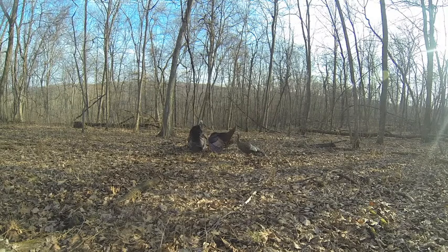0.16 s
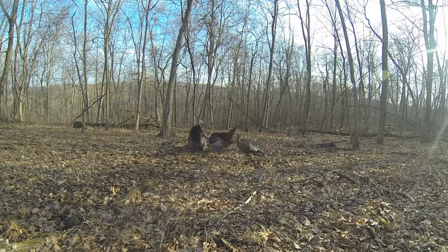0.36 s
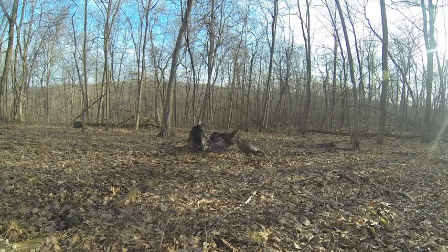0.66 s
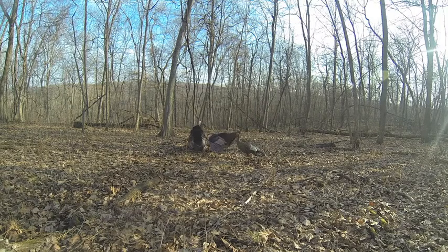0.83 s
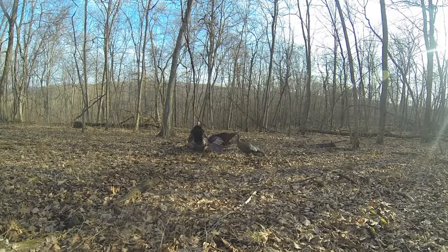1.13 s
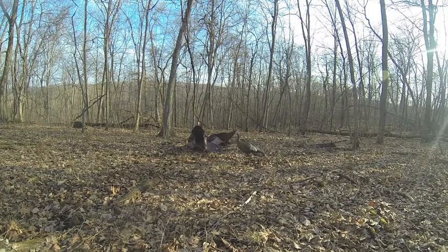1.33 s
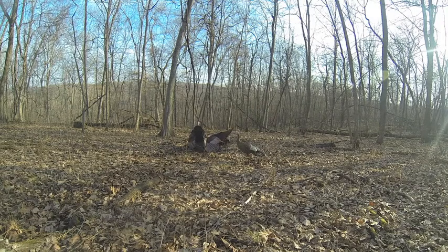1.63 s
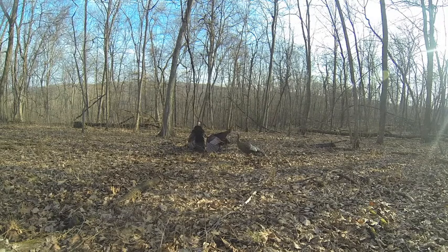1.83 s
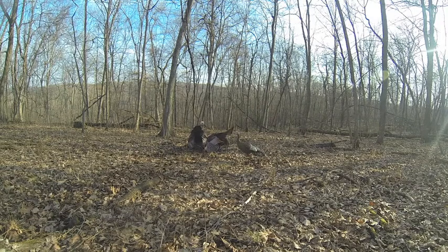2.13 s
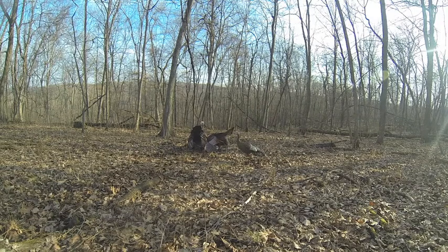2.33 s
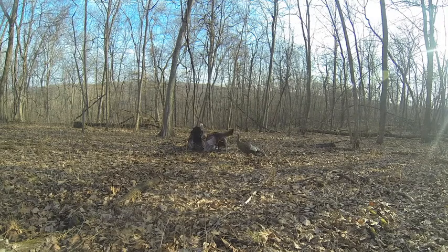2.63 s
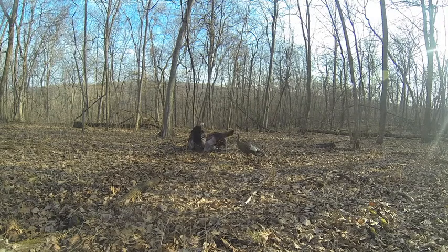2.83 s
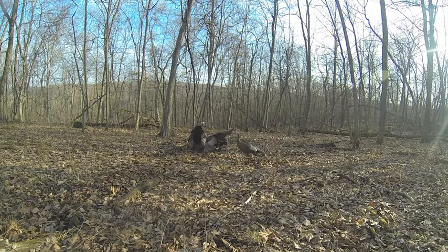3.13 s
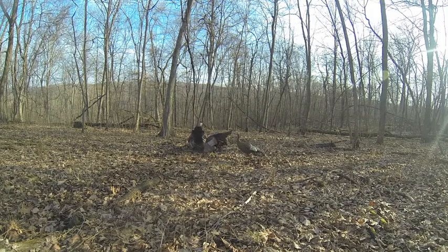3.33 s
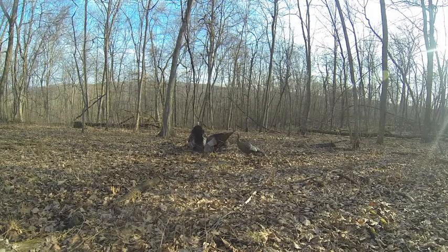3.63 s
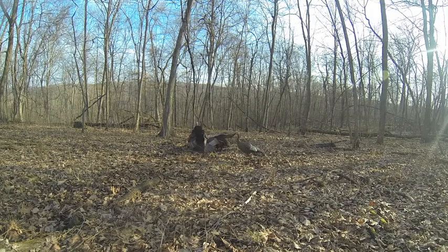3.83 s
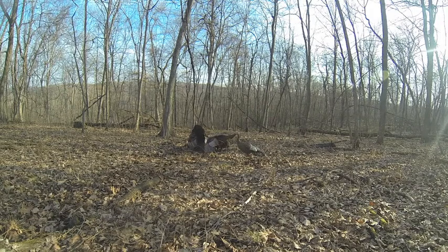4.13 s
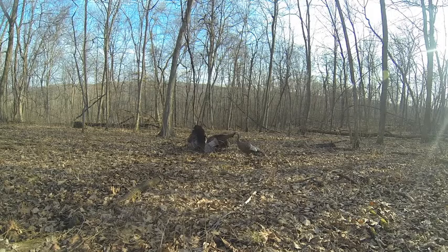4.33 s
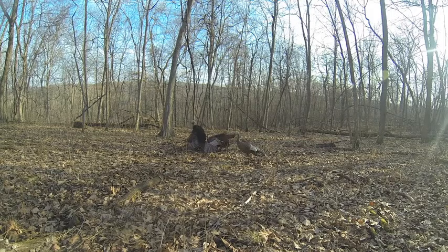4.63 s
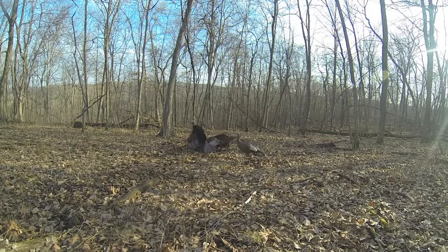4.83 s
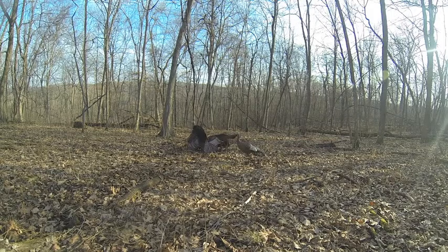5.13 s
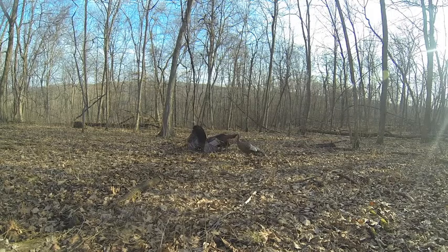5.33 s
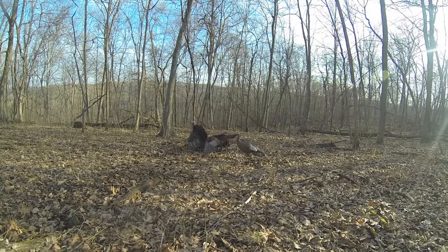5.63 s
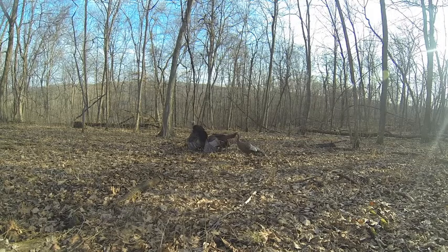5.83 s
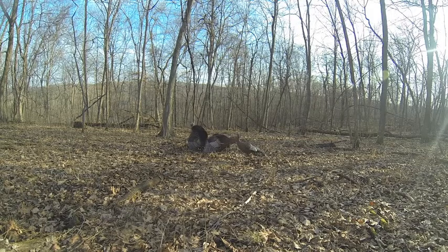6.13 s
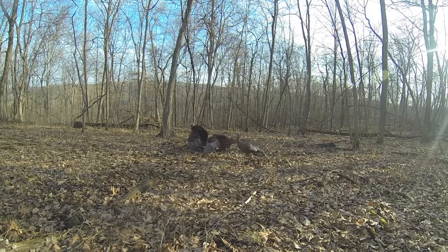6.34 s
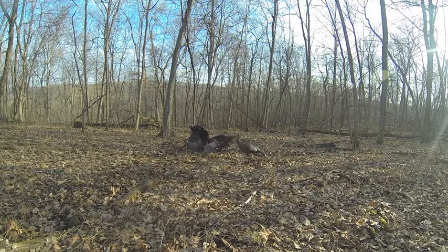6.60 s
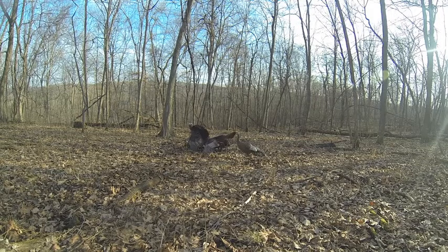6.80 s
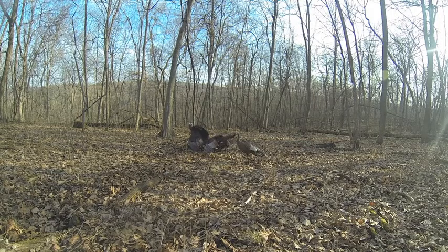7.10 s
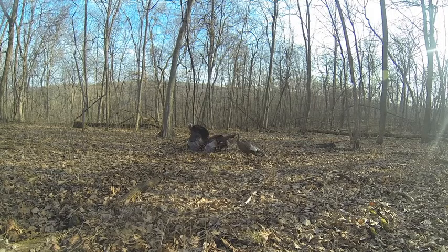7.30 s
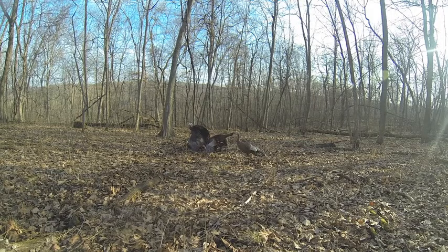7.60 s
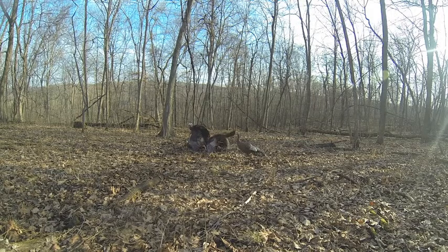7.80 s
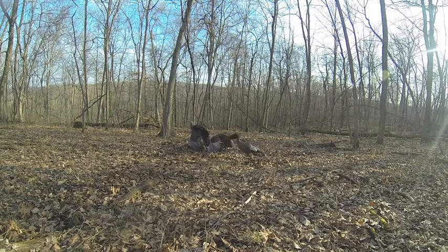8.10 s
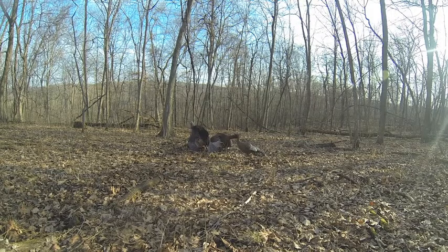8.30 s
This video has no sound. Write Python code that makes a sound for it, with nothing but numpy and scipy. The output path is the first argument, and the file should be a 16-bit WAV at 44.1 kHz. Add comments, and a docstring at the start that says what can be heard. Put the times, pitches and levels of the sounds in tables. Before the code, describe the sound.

Wild turkeys fight in open leafless woods. Low, soft-edged thumps of wings and bodies come irregularly, several a second, with leaf crunch and twig snaps. Quick sliding yelps and a brief purring rattle open the scene; the middle is mostly blows and scuffling. From about six seconds sharp, resonant putts and hoarse breaking notes join heavier hits. A songbird whistles faintly far off. A fixed outdoor microphone catches low air rumble, light hiss and faint trunk echoes.

```python
"""A faint whistle over a low rumble of air, then thumps and sliding calls: wild turkeys fight in a forest.
Harmonic voices rattle in short gliding notes; later come resonant putts and hoarse notes that break upward.
Wings and bodies thump as brief decaying swings; feet stir dry leaves, made of band-filtered random grains.
A songbird whistles far off as swept sines, and tree trunks return sparse, dying echoes."""
import sys
import numpy as np
from scipy import signal
from scipy.fft import rfft, irfft, next_fast_len
from scipy.io import wavfile

SR = 44100
rng = np.random.default_rng(int(sys.argv[2]) if len(sys.argv) > 2 else 0)


def dump(signal):
    """Clip the signal to [-1, 1] and save it as 16-bit WAV at the path in sys.argv[1]."""
    limited = np.clip(np.atleast_2d(signal).T, -1, 1)
    pcm = np.round(limited * 32767).astype(np.int16)
    wavfile.write(sys.argv[1], SR, pcm)


N = 373086
TOP_HZ = 15300  # upper edge of the scene's band

# blows of wings and bodies: (time [s], peak level [dB], pitch at the peak [Hz], time scale [s],
# feather slap level before its common lift [dB])
BLOW_EVENTS = [(0.303, -24, 230.8, 0.0032, -46), (0.313, -22.5, 85, 0.006, -54),
               (.782, -25.5, 89.5, 0.012, -61), (1.2, -25.5, 150.4, 0.0033, -51),
               (1.211, -28, 67.6, 0.016, -60), (1.622, -22, 93, 0.0051, -45),
               (1.635, -27.5, 64, 0.012, -66), (1.818, -32, 59.6, 0.0099, -76),
               (2.062, -22.5, 78.7, 0.0061, -44.5), (2.08, -26.5, 89.5, 0.0065, -60),
               (2.215, -28, 101.7, .01, -48.5), (2.456, -20.5, 105.6, 0.013, -45.5),
               (2.485, -24.5, 161, 0.0064, -44.5), (2.805, -32, 138, 0.0033, -59),
               (3.198, -28, 137.5, 0.0038, -50), (3.258, -34.5, 133.2, .015, -55),
               (3.466, -29.5, 147, 0.0061, -64), (3.555, -30.5, 131, 0.0083, -57),
               (3.769, -24, 99.8, 0.0074, -45), (3.793, -30.5, 110.4, 0.0075, -67),
               (4.019, -36.5, 151, 0.0052, -54), (4.043, -29, 112, 0.012, -54),
               (4.144, -23.5, 124, 0.0059, -50.5), (4.301, -23.5, 97.6, 0.0043, -45),
               (4.314, -28, 89.8, 0.01, -69), (4.559, -30, 105.5, 0.011, -56),
               (4.792, -24.5, 152.4, 0.0043, -52), (4.881, -16.5, 131, 0.011, -43),
               (4.907, -33, 139.7, 0.0052, -52), (5.154, -31, 146.4, 0.01, -52.5),
               (5.486, -34, 296, 0.006, -50), (5.504, -25.5, 131, 0.0085, -44),
               (5.52, -21, 95.9, 0.0096, -54), (5.744, -19.5, 108.2, 0.0075, -44),
               (5.779, -27, 200.3, 0.0033, -47), (6.202, -21, 115, 0.0068, -45),
               (6.218, -25.5, 129.5, 0.013, -56), (6.461, -24, 121.7, 0.012, -52.5),
               (6.487, -24.5, 109.4, 0.0065, -50.5), (6.843, -20.5, 130.3, .0033, -52.5),
               (6.898, -25.5, 105.4, 0.011, -46), (6.921, -25, 102.3, 0.0054, -39.5),
               (6.927, -15, 96.6, 0.0065, -45), (6.944, -26, 89, 0.0087, -59),
               (7.154, -23.5, 193, 0.01, -47.5), (7.407, -20.5, 94.7, 0.0055, -54),
               (7.617, -35, 156, 0.0087, -48), (7.981, -16.5, 102.8, 0.014, -45),
               (8.196, -27, 142, 0.0077, -46.5), (8.23, -31.5, 132.5, 0.014, -49.5),
               (8.316, -27, 100, 0.0065, -58), (8.336, -24.5, 124.8, 0.0094, -52),
               (8.449, -17.5, 172.7, 0.0027, -43.5)]


def rattles(push=0.65):
    """Frequency modulation: quick, mostly scooped notes, sliding yelps and a faint echoed note near 1100 Hz."""
    # (time [s], length [s], pitch [Hz], level [dB], overtones [dB], scoop depth [1 = usual])
    rattle_notes = [(0.95, 0.015, 534, -53, 17.5, -0.16), (1.887, 0.032, 676, -46, -7, 1),
                    (1.952, 0.02, 665, -43.5, -6, 0.71), (2.011, 0.02, 640, -41.5, -2, 1.15),
                    (2.068, .022, 630, -40.5, -2, 1.06), (2.122, 0.02, 618, -42, 0, 1.03),
                    (2.17, 0.024, 614, -44.5, 5, 0.33), (2.22, 0.014, 665, -50, 0, 0.58),
                    (2.265, .017, 600, -44, 4, 0.33), (4.588, 0.033, 634, -48.5, 2.5, 0.11),
                    (5.434, 0.017, 595, -48.5, 2, .9), (5.615, 0.026, 610, -44.5, -2, 1.14),
                    (5.682, 0.028, 651, -42.5, 4, 1.1), (5.797, .016, 615, -48, 5, 1.1),
                    (5.85, 0.017, 640, -48.5, 6.5, .6)]
    # pitch at the start, middle and end of a note: (ratio)
    scoop = (0.9, 0.98, 1.16)
    # sliding yelps and, at 7.537 s, a faint echoed note near 1100 Hz:
    # (time [s], length [s], start [Hz], end [Hz], level before the push [dB])
    sliding_notes = [(0.393, 0.019, 638, 930, -43.5), (0.412, 0.038, 980, 559, -40),
                     (0.437, .02, 1300, 1110, -52), (0.487, 0.021, 1107, 563, -37.5),
                     (0.545, .014, 550, 1240, -37.5), (0.596, 0.0076, 680, 1250, -45.5),
                     (0.633, 0.013, 578, 1250, -38), (0.723, 0.026, 1120, 1194, -56.5),
                     (.765, 0.067, 1014, 853, -60), (0.854, 0.039, 968, 840, -53),
                     (1.032, 0.013, 544, 454, -40), (1.072, .024, 542, 320, -50),
                     (1.789, 0.13, 670, 550, -53.5), (2.303, 0.021, 730, 870, -53),
                     (2.337, 0.014, 635, 474, -43.5), (3.945, 0.037, 904, 1020, -58.5),
                     (4.734, 0.016, 950, 925, -57), (4.757, 0.017, 960, 920, -54),
                     (4.784, .02, 1004, 954, -52), (5.901, 0.016, 760, 790, -55),
                     (5.976, 0.024, 800, 770, -53.5), (7.52, 0.011, 710, 970, -43),
                     (7.537, .022, 1130, 1080, -56), (8.045, 0.015, 1600, 945, -46)]
    flick, droop = 3.36, 1.18  # bend exponents of rising and falling notes

    out = np.zeros(N)
    for s, length, pitch_hz, db, overtone_db, depth in rattle_notes:
        hz = arch(length, pitch_hz, np.array(scoop) ** depth)
        add(out, s, undb(db) * hollow(hz, overtone_db))
    for s, length, start_hz, end_hz, db in sliding_notes:
        if end_hz > start_hz:
            # time reversal makes the pitch hang low, then flick up
            hz = slide(length, end_hz, start_hz, flick)[::-1]
        else:
            hz = slide(length, start_hz, end_hz, droop)
        # a sliding note is louder where it is pushed higher
        effort = unit(hz ** push)
        add(out, s, undb(db) * effort * hollow(hz, overtone_db=-4.5, edge=0.15))
    return out


def hollow(hz, overtone_db, jitter=0.043, edge=0.32):
    """Resonance: a soft note whose second and third harmonics sound as they pass the mouth's resonance."""
    # strongest at the mouth's resonance: (frequency [Hz], overtone gain [dB])
    mouth = [(900, -24), (1220, -11.5), (1330, -12), (1500, -26), (2000, -25), (3000, -36)]
    phase = phase_of(hz * (1 + jitter * wander(len(hz), 443)))
    overtones = sum(gain_at(k * hz, mouth) * np.sin(k * phase) for k in range(2, 4))
    return ends(len(hz), edge) * (np.sin(phase) + undb(overtone_db) * overtones)


def putts(edge=0.087, fade=0.68, first_fade=2.6, throb=0.59):
    """Source and filter: click and fundamental lead, the throat rings, the beak opens; air rasps each cycle."""
    # (time [s], length [s], pitch [Hz], level [dB], roughness [0-1], throat resonance [Hz],
    # fundamental [dB], beak resonance [dB], buzz [dB], rise depth [1 = usual],
    # loudest point [0-1], treble [dB])
    putt_notes = [(6.088, 0.026, 692, -36.5, 0.54, 2040, 0.5, -7, -4.5, 0.93, .27, 6),
                  (6.343, .021, 717, -35.5, 0.31, 2140, -7.5, -33, -14, 0.93, 0.56, 3.5),
                  (6.974, 0.029, 740, -41.5, .85, 2290, -5.5, -4, -10, 0.73, 0.34, -2),
                  (7.233, .029, 701, -37, 0.48, 2110, -6, -12, -7.5, 0.74, .25, 2.5),
                  (7.622, 0.0262, 678, -35.5, 0.38, 2090, -3, -24, -1.5, 1.006, 0.7, 2),
                  (7.89, 0.021, 707, -35, 0.4, 2090, -16, -38, -19, 1.08, .6, -6),
                  (8.207, 0.024, 677, -35, 0.42, 2160, -6, -15, -2, 0.85, 0.57, -4)]
    # pitch jumps up, holds, then flicks up again: (ratio) at even steps
    putt_rise = (.79, 0.952, 0.997, 1.05, 1.19)
    # broad colour of the voice beneath its two resonances: (frequency [Hz], relative level [dB])
    voice_colour = [(150, -45), (450, -18), (800, -12), (1450, -17.5), (2100, -6), (2800, -20), (3300, -45),
                    (3900, -14), (4800, -29), (5800, -23.5), (8000, -34.5), (12000, -37.5), (15000, -44)]
    throat_width_hz, opening = 500, 0.07  # opening is the relative climb of the throat resonance
    beak_hz, beak_width_hz, beak_opens = 2850, 900, 0.8  # opens widest at this fraction of the note
    click_db, click_s, rasp_db = -9, 0.0025, -2.5

    out = np.zeros(N)
    order = np.arange(1, 20)[:, None]
    for (s, length, pitch, db, rough, throat_hz, first_db, beak_db, buzz_db,
         rise, loudest, treble_db) in putt_notes:
        hz = arch(length, pitch, np.array(putt_rise) ** rise)
        u = np.linspace(0, 1, len(hz))
        effort = hump(u, loudest) ** 0.3
        jitter, shimmer = 0.035 * rough, 0.45 * rough
        phase = phase_of(hz * (1 + jitter * wander(len(hz), 930)))
        partials = order * hz

        random_phases = np.exp(2j * np.pi * rng.random(order.shape))
        buzz = undb(buzz_db) * gain_at(partials, voice_colour) * random_phases
        # the resonance climbs with the pitch as the throat opens
        moving_throat_hz = throat_hz * (1 + opening * rise * (2 * u - 1))
        throat = 1 / (1 + 2j * (partials - moving_throat_hz) / throat_width_hz)
        beak = 1 / (1 + 2j * (partials - beak_hz) / beak_width_hz)
        beak_gain = undb(beak_db) * hump(u, beak_opens) ** 2
        # each resonance acts twice in magnitude, once in phase
        ringing = throat * abs(throat) + beak_gain * beak * abs(beak)

        fading_buzz = buzz * (1 + fade * (1 - 2 * u))
        throbbing = ringing * (1 + throb * rough * wander(len(hz), 196))
        gains = effort * (fading_buzz + throbbing)
        gains[0] = undb(first_db) * np.exp(-first_fade * u ** 2)
        gains = gains * (partials < TOP_HZ)
        voice = unit(np.real(gains * np.exp(1j * order * phase)).sum(axis=0))
        voice *= 1 + shimmer * wander(len(hz), 390)

        breath = rng.standard_normal(len(hz)) * (1 + np.cos(phase))
        rasp = effort * colour(breath, voice_colour)
        click = colour(rng.standard_normal(len(hz)), voice_colour)
        click *= undb(click_db) * np.exp(-u * length / click_s)
        note = click + ends(len(hz), edge) * unit(voice + rough * undb(rasp_db) * rasp)
        add(out, s, undb(db) * brighten(note, treble_db))
    return out


def hoarse_breaks(edge=0.067, first_fade=0.42, opens=0.84, throb=0.38):
    """Register break: pitch sags, then jumps; a second membrane beats against the voice and makes it hoarse."""
    # hoarse breaking notes, two full yelps and three short low openings of putts:
    # (time [s], length [s], low pitch [Hz], high pitch [Hz], point of the break [0-1],
    # level [dB], roughness [relative], overtones [dB])
    hoarse_notes = [(6.339, 0.0078, 850, 960, .5, -51, .8, -10),
                    (6.523, 0.025, 862, 1145, 0.3, -41, 0.64, -1),
                    (6.711, .042, 860, 1060, .35, -41, 1.06, -3.5),
                    (6.97, .011, 900, 984, .4, -42.5, 0.9, -1),
                    (7.888, 0.0112, 847, 910, .5, -46.5, 0.7, -12)]
    # overtones: (frequency [Hz], relative level [dB])
    hoarse_colour = [(500, -25), (1400, -16), (1750, -11), (2350, 1), (2800, -11), (3300, -23), (3900, -17),
                     (4650, -17), (5200, -31), (5800, -20), (8000, -33), (12000, -24), (15000, -34)]
    break_s, sag = 0.0018, 0.145
    second_ratio, second_depth, rasp_db = 0.68, 0.62, -4  # second membrane's pitch as a ratio

    out = np.zeros(N)
    for s, length, low_hz, high_hz, point, db, rough, overtone_db in hoarse_notes:
        u = np.linspace(0, 1, int(length * SR))
        jumped = (1 + np.tanh((u - point) * length / break_s)) / 2
        sagging_hz = low_hz * (1 + sag * (1 - 2 * u / point))
        hz = (1 - jumped) * sagging_hz + jumped * high_hz
        phase = phase_of(hz * (1 + 0.05 * rough * wander(len(u), 700)))
        beat_hz = hz * (1 - second_ratio) * (1 + 0.185 * wander(len(u), 300))
        beat = second_depth * rough * np.sin(phase_of(beat_hz))

        pulses = sum(np.cos(k * (phase + beat)) for k in range(2, 12))
        breath = rng.standard_normal(len(u)) * (1 + np.cos(phase))
        rasp = rough * undb(rasp_db) * unit(breath)
        overtones = colour(unit(pulses) + rasp, hoarse_colour)
        overtones *= undb(overtone_db) * hump(u, opens) ** 0.5
        first = unit(np.cos(phase + beat / 2)) * (1 - first_fade * u)
        first *= 1 + throb * rough * wander(len(u), 265)
        add(out, s, undb(db) * ends(len(u), edge) * unit(first + overtones))
    return out


def blows(sag=0.2968, rise=0.4, tail=1.51, flutter=0.31, overtone_db=-15):
    """Impulsive air displacement: a short swing sinks in pitch; a noisy feather slap comes just ahead."""
    # feather slap: (frequency [Hz], relative level [dB])
    slap_colour = [(60, -34), (150, -6), (260, 2), (360, 4), (500, -5.5), (800, -14.5), (1200, -15.5),
                   (2000, -36), (5000, -37), (12000, -84)]
    slap_lift_db, slap_lead_s, slap_rise_s, slap_stretch = 6, 0.0037, 0.0026, 0.87
    out, slaps = np.zeros(N), np.zeros(N)
    t = np.arange(-SR // 20, SR // 10) / SR
    for s, db, hz, length, feather_db in contacts():
        push = 1 / np.cosh(2 * t / (length * np.where(t < 0, rise, tail)))
        # the pitch falls fastest at the height of the push
        phase = phase_of(hz * (1 - sag * np.tanh(t / length))) + rng.uniform(0, 2 * np.pi)
        swing = np.sin(phase) + undb(overtone_db) * push * np.sin(2 * phase)
        uneven = 1 + flutter * wander(len(t), 301.2)
        add(out, s + t[0], undb(db) * push * swing * uneven)
        contact = np.exp(np.where(t < 0, t / slap_rise_s, -t / (slap_stretch * 2 * length)))
        add(slaps, s + t[0] - slap_lead_s, undb(feather_db + slap_lift_db) * contact)
    return out + slaps * colour(rng.standard_normal(N), slap_colour)


def contacts(step_spread_db=3, step_spread_octaves=0.312):
    """Random excitation: light footfalls at random times join the blows, in the same columns."""
    # the birds push and tread between: (start [s], end [s])
    shoving_s = (2.8, 5.4)
    step_db, step_hz, step_length_s, step_slap_db = -41, 150.9, 0.0049, -56.5  # central values
    rows = list(BLOW_EVENTS)
    for when, force, size in rng.uniform(-1, 1, (12, 3)):
        s = np.interp(when, (-1, 1), shoving_s)
        extra_db = step_spread_db * force
        hz = step_hz * 2 ** (step_spread_octaves * size)
        rows.append((s, step_db + extra_db, hz, step_length_s, step_slap_db + extra_db))
    return rows


def claps():
    """Impact noise: stiff wing feathers clap on a body."""
    # (time [s], level [dB])
    clap_events = [(1.199, -40.5), (1.619, -42), (4.004, -45), (4.023, -41), (4.046, -36), (4.294, -43),
                   (4.303, -38.5), (4.876, -42), (4.886, -41), (4.906, -37), (4.918, -44), (5.479, -36.5),
                   (5.504, -38), (5.517, -43), (5.74, -45), (5.775, -43.5), (6.912, -38), (7.977, -34),
                   (7.988, -46)]
    # (frequency [Hz], relative level [dB])
    clap_colour = [(120, -22), (350, 7.5), (620, 2), (950, -9), (1220, -6.5), (1500, -32), (5000, -26),
                   (12000, -55)]
    return cracks(clap_events, 0.004, clap_colour)


def leaves(level_db=1, clump_db=2, tread_treble_db=-6):
    """Granular friction: feet tread with a muffled crunch; swipes of feet and wing tips swell and fade."""
    # (time of the height [s], level before the common grain gain [dB], swell [s], fade [s], treble [dB])
    swipe_events = [(1.08, -58, 0.032, 0.028, 2), (1.213, -57, 0.026, 0.047, 0),
                    (3.125, -58, 0.035, 0.046, 3.5), (3.25, -53.5, 0.067, 0.056, -2.5),
                    (3.767, -49, 0.045, 0.042, 1), (3.773, -46.5, 0.0086, 0.0084, -6),
                    (4.89, -59, 0.048, 0.074, -10), (5.505, -61, 0.018, 0.061, -5),
                    (6.2, -53, 0.038, 0.061, -3), (7.0, -50, 0.049, 0.051, -3),
                    (7.345, -54.5, 0.033, 0.021, 3), (7.4, -50, 0.026, 0.022, 2),
                    (7.66, -57, 0.042, 0.076, -2), (7.83, -54, 0.076, 0.083, 2),
                    (7.89, -54.5, 0.036, 0.038, 0), (7.99, -55, .04, 0.065, -4),
                    (8.11, -52, 0.04, .025, -1.5)]
    grains = crackle() * undb(level_db + clump_db * wander(N, 60))
    out = brighten(grains, tread_treble_db) * treading()
    t = np.arange(-SR // 3, SR // 3) / SR
    for s, db, swell, fade, treble_db in swipe_events:
        sweep = undb(db) * np.exp(np.where(t < 0, t / swell, -t / fade))
        start = rng.integers(N - len(t))
        swept_grains = sweep * grains[start:start + len(t)]
        add(out, s + t[0], brighten(swept_grains, treble_db))
    return out


def treading(lead_s=0.046, settle_s=0.053):
    """Addition of powers: a steady shuffle of leaves and a stir around every blow give the amplitude."""
    shuffle_db, stir_db = -65, -15.5  # before the grain gain; the stir is relative to the listed slap
    power = np.full(N, undb(shuffle_db) ** 2)
    t = np.arange(-SR // 10, SR // 2) / SR
    stir = np.exp(np.where(t < 0, t / lead_s, -t / settle_s))
    for s, *_, slap_db in BLOW_EVENTS:
        add(power, s + t[0], (undb(slap_db + stir_db) * stir) ** 2)
    return np.sqrt(power)


def crackle(grains_per_s=900, spread_db=0.5, count=14):
    """Impulse response: tiny leaf cracks each ring in one of several bands; the rate is per band."""
    # (frequency [Hz], relative level [dB])
    leaf_colour = [(300, 9.5), (900, 0.5), (1800, -1), (3500, 0.5), (5500, -1), (7200, -8), (10000, -6),
                   (11500, -10), (13500, -8.5), (15500, -24)]
    out = np.zeros(N)
    edges = np.linspace(np.sqrt(200), np.sqrt(TOP_HZ), count + 1) ** 2
    for band in zip(edges, edges[1:]):
        extra_db = spread_db * np.minimum(rng.exponential(size=N), 5)
        sizes = undb(extra_db) * rng.standard_normal(N)
        impulses = sizes * (rng.random(N) < grains_per_s / SR)
        band_filter = signal.butter(2, band, "bandpass", fs=SR, output="sos")
        out += signal.sosfilt(band_filter, impulses)
    return colour(out, leaf_colour)


def twig_snaps():
    """Brittle fracture: snapping twigs give short broadband bursts."""
    # (time [s], level [dB])
    snap_events = [(.28, -51), (.517, -47.5), (1.032, -45.5), (1.183, -45), (1.62, -58), (1.933, -49),
                   (2.063, -35.5), (2.452, -47), (2.484, -55), (4.024, -53), (4.046, -60), (4.228, -55),
                   (4.297, -46), (4.882, -53), (5.292, -59), (5.505, -48), (5.741, -41), (5.748, -45),
                   (5.775, -59), (6.198, -43), (6.62, -48.5), (6.885, -48), (6.912, -33.5), (6.926, -36),
                   (7.448, -50), (7.929, -39), (7.961, -40), (7.977, -40), (7.99, -50)]
    # (frequency [Hz], relative level [dB])
    snap_colour = [(300, 6), (1000, 1.5), (3500, 4.5), (5500, -4.5), (7500, -27), (15000, -36)]
    return cracks(snap_events, 0.0029, snap_colour)


def leaf_ticks():
    """Brittle fracture: single leaves crack with a shorter, treble-heavy burst."""
    # (time [s], level [dB])
    tick_events = [(1.068, -42), (1.085, -52), (1.095, -50), (3.844, -50), (7.025, -54), (7.448, -48),
                   (7.607, -47), (7.929, -42.5)]
    # (frequency [Hz], relative level [dB])
    tick_colour = [(1500, -25), (3500, -5), (5000, 3), (7500, -4), (13500, -3), (15500, -8)]
    return cracks(tick_events, 0.0015, tick_colour)


def cracks(table, decay_s, spectrum):
    """Transient decay: coloured noise starts at once and dies exponentially within milliseconds."""
    out = np.zeros(N)
    burst = np.exp(-np.arange(SR // 10) / SR / decay_s)
    for s, db in table:
        add(out, s, undb(db) * burst)
    return out * colour(rng.standard_normal(N), spectrum)


def songbird(waver=0.0093, flicker_db=1.0):
    """Pure tones with gliding frequency: slurred whistles from far off in the trees."""
    # falling phrase: (time from its start [s], pitch [Hz], relative level [dB])
    phrase = [(0, 2750, -5), (.012, 2519, -2), (.03, 2339, 1.5), (.052, 2193, -1), (0.074, 2279.5, -15),
              (.1, 2099, 0.5), (.14, 1860.5, 5.5), (.17, 1698, -1), (.205, 1578, -6), (.24, 1458, -10),
              (.256, 1427, -19)]
    # its repeats: (time [s], level [dB], length [1 = usual])
    repeats = [(1.885, -57, 1.02), (2.322, -55, 0.96), (2.753, -55, 1.05)]
    # single whistles: (time [s], length [s], start [Hz], end [Hz], level [dB],
    # bend [above 1 the slide levels out, below 1 it steepens])
    single_whistles = [(0, 0.143, 2160, 2180, -62, 0.94), (.665, .03, 3220, 3020, -69, 1),
                       (1.12, 0.046, 2630, 2460, -63, 1.9), (1.441, .082, 3190, 2620, -64, 1.8),
                       (1.558, .043, 2650, 1720, -61.5, 1.2), (5.922, .072, 4070, 2860, -64, 1.4),
                       (6.145, 0.046, 3280, 3550, -60, 1.9), (6.304, 0.042, 2730, 3220, -57.5, .7),
                       (6.478, 0.053, 3280, 3680, -57.5, 2.1)]

    out = np.zeros(N)
    at, pitch, level = np.transpose(phrase)
    for s, db, stretch in repeats:
        t = np.linspace(0, at[-1], int(stretch * at[-1] * SR))
        hz = np.interp(t, at, pitch) * (1 + waver * wander(len(t), 88.4))
        loudness_db = db + np.interp(t, at, level) + flicker_db * wander(len(t), 74)
        add(out, s, undb(loudness_db) * np.sin(phase_of(hz)))
    for s, length, start_hz, end_hz, db, bend in single_whistles:
        hz = slide(length, start_hz, end_hz, bend)
        hz = hz * (1 + waver * wander(len(hz), 95))
        add(out, s, undb(db) * ends(len(hz), edge=0.15) * np.sin(phase_of(hz)))
    return out


def trunks(x, t60, echoes_per_s=1500, gap=0.0053):
    """Multiple scattering: separate weak trunk echoes build after a gap [s] and fall 60 dB in t60 [s]."""
    # (frequency [Hz], relative level [dB])
    wood_colour = [(100, -1), (600, 0), (1200, 3.5), (2200, -6.5), (3000, -2), (7000, -5.5), (14000, -10)]
    t = np.arange(SR) / SR
    echoes = rng.standard_normal(SR) * (rng.random(SR) < echoes_per_s / SR)
    echoes *= (1 - np.exp(-(t / gap) ** 2)) * np.exp(-np.log(1000) * t / t60)
    response = colour(echoes, wood_colour) / np.sqrt(SR)
    return signal.fftconvolve(x, response)[:N]


def air(flicker_db=3.5, swell_db=2.0):
    """Filtered noise: a steady hiss and a low rumble of uneven level."""
    # hiss: (frequency [Hz], relative level [dB])
    hiss_colour = [(12, -56), (20, 8.5), (49, -4.5), (80, 0.5), (289, -26), (614, -18.5), (1450, -26.5),
                   (4070, -33.5), (4950, -31), (7520, -42), (9930, -37.5), (11400, -46), (13100, -37),
                   (14300, -42), (15500, -40)]
    # rumble: (frequency [Hz], relative level [dB])
    low_colour = [(15, -7.5), (28, -6), (50, 2.5), (85, -1.5), (125, -6.5), (200, -14.5), (400, -20.5),
                  (900, -47)]
    hiss = undb(-51.5) * colour(rng.standard_normal(N), hiss_colour)
    rumble_db = -47.5 + flicker_db * wander(N, 12) + swell_db * wander(N, 2.92)
    rumble = undb(rumble_db) * colour(rng.standard_normal(N), low_colour)
    return hiss + rumble


def undb(db):
    """Logarithmic level: decibels to amplitude gain."""
    return 10 ** (np.asarray(db) / 20)


def unit(x):
    """Mean power: scale to rms 1."""
    return x / np.sqrt(np.mean(x ** 2) + 1e-20)


def gain_at(hz, points):
    """Frequency response: interpolate (frequency [Hz], level [dB]) points on a log-frequency axis."""
    f, db = np.transpose(points)
    return undb(np.interp(np.log(hz + 1), np.log(f), db))


def colour(x, points):
    """Spectral filtering: shape by (frequency [Hz], level [dB]) points, then scale to rms 1."""
    size = next_fast_len(len(x))
    gains = gain_at(np.fft.rfftfreq(size, 1 / SR), points)
    return unit(irfft(rfft(x, size) * gains, size)[:len(x)])


def brighten(x, db, edge_hz=6800):
    """Shelving filter: raise or lower the treble by db."""
    low = signal.sosfiltfilt(signal.butter(3, edge_hz, fs=SR, output="sos"), x)
    return low + undb(db) * (x - low)


def wander(size, rate):
    """Random modulation: normal random values joined by lines, rate of them a second."""
    at = np.arange(size) * rate / SR
    knots = rng.standard_normal(int(at[-1]) + 2)
    return np.interp(at, np.arange(len(knots)), knots)


def add(out, s, x):
    """Superposition: mix x in at time s."""
    i = min(max(int(s * SR), 0), N)
    out[i:i + len(x)] += x[:N - i]


def phase_of(hz):
    """Phase is the integral of frequency, in radians."""
    return 2 * np.pi * np.cumsum(hz) / SR


def ends(size, edge):
    """Amplitude envelope: a note with rounded ends; rms 1."""
    u = np.linspace(0, 1, size)
    return unit(np.sin(np.pi / 2 * np.clip(np.minimum(u, 1 - u) / edge, 0, 1)))


def hump(u, top):
    """Amplitude envelope: rises from 0 to 1 at the point top, kept within 0.1-0.9, and falls back."""
    return abs(np.sin(np.pi * np.interp(u, (0, np.clip(top, 0.1, 0.9), 1), (0, 0.5, 1))))


def arch(length, hz, ratios):
    """Frequency contour: a polynomial bends smoothly through evenly spaced ratios of hz."""
    u = np.linspace(0, 1, int(length * SR))
    curve = np.polyfit(np.linspace(0, 1, len(ratios)), ratios, len(ratios) - 1)
    return hz * np.polyval(curve, u)


def slide(length, start_hz, end_hz, bend):
    """Frequency glide: a power law levels out at its end for bend above 1 and steepens below 1."""
    return end_hz + (start_hz - end_hz) * np.linspace(1, 0, int(length * SR)) ** bend


def scene():
    """Superposition of direct sound, echoes and air; each kind of source has its own echo level."""
    soft, sharp, hoarse, bird = rattles(), putts(), hoarse_breaks(), songbird()
    thumps = blows() + claps()
    litter = leaves() + twig_snaps() + leaf_ticks()
    direct = soft + sharp + hoarse + thumps + litter + bird

    calls_echo = trunks(undb(-18.0) * soft + undb(-10.0) * sharp, t60=0.77)
    calls_echo += trunks(undb(-12.5) * hoarse, t60=0.47)
    ground_echo = trunks(undb(-19.5) * thumps + undb(-15.0) * litter, t60=0.41)
    bright_bird = brighten(bird, 5, edge_hz=1600)
    bird_echo = undb(-8.5) * trunks(bright_bird, t60=0.86, gap=0.01)
    return (direct + calls_echo + ground_echo + bird_echo + air())[None]


def record(dry):
    """Low-pass filtering: a steep elliptic filter cuts the top of the band."""
    return signal.sosfilt(signal.ellip(10, 0.2, 70, TOP_HZ, fs=SR, output="sos"), dry)


dry = scene()
out = record(dry)
dump(out)
```